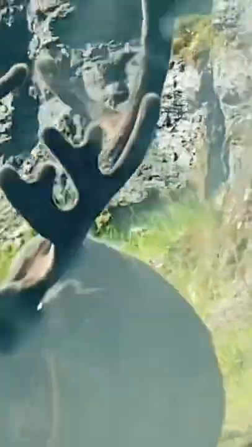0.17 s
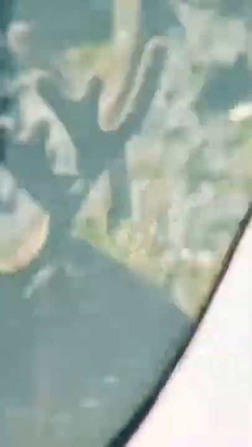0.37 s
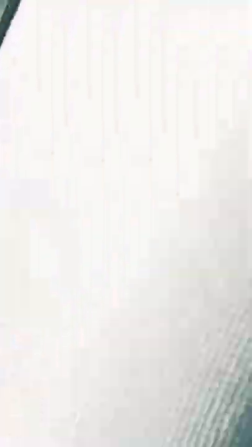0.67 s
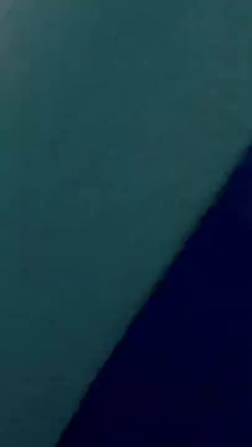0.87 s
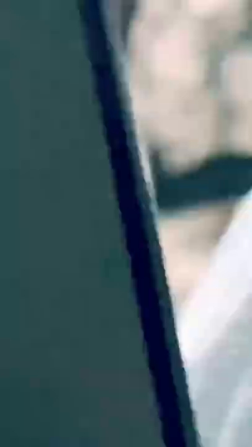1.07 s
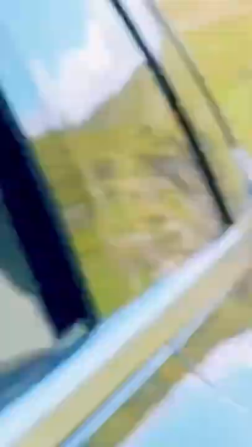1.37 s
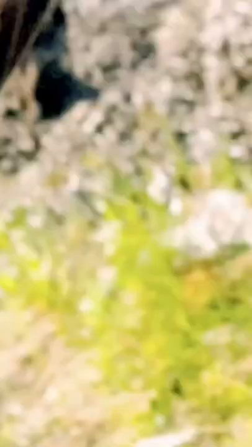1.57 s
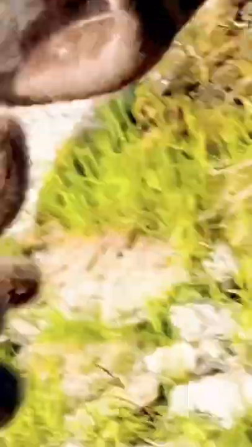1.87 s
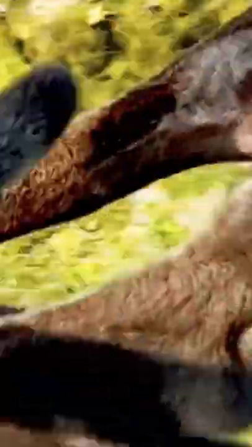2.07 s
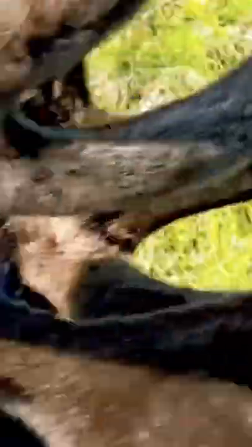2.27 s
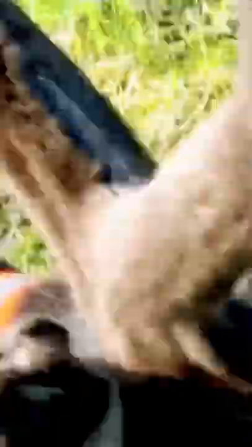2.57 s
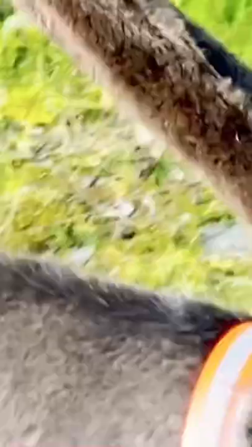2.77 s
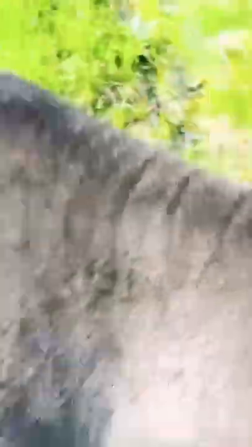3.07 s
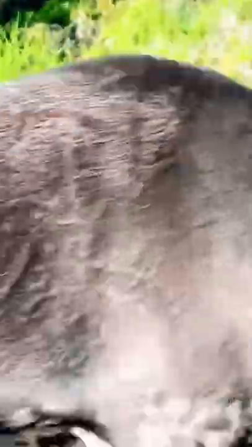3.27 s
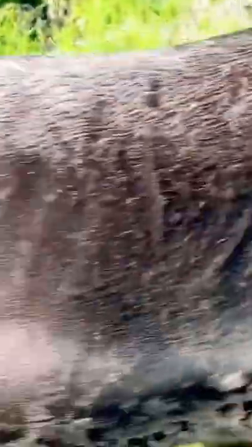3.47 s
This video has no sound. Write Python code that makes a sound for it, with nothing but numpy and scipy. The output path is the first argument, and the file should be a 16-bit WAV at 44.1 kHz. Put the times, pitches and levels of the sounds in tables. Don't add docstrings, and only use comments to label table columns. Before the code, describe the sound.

A diesel engine idles throughout, boomy and muffled inside the cabin with faint clicks; then the microphone swings to the open window, where clatter and hiss brighten and reindeer hooves snap, scuff and knock.

```python
import sys
import numpy as np
from scipy import signal
from scipy.fft import rfft, irfft, next_fast_len
from scipy.io import wavfile
from scipy.ndimage import uniform_filter1d, map_coordinates

SR = 44100
rng = np.random.default_rng(int(sys.argv[2]) if len(sys.argv) > 2 else 0)


def boost_factor(decibels):
    exponent = np.asarray(decibels, float) / 20
    return 10 ** exponent


def output_pcm(signal):
    pcm = np.clip(np.atleast_2d(signal).T, -1, 1) * 32767
    wavfile.write(sys.argv[1], SR, np.round(pcm).astype(np.int16))


N = 160083

# [t/s, clatter level/dB, road hiss level/dB]
WINDOW = [
    (0.0, -61, -72.5),
    (1.21, -60, -72),
    (1.55, -57.5, -69),
    (1.8, -56.5, -66.5),
    (2.19, -54, -62),
    (2.48, -51.5, -65),
    (2.62, -51.5, -58.5),
    (2.94, -49.5, -63),
    (3.4, -50, -60),
    (3.63, -49.5, -61),
]
# [f/Hz, level/dB]
SHEEN_TONE = [(12000, -18), (12700, 0), (13400, -12), (14100, 9), (15500, 1), (15900, -8), (16100, -40),
              (16500, -70)]


def unit(x):
    return x / np.sqrt(np.mean(x ** 2) + 1e-20)


def along(points, hz):
    f, v = np.transpose(points)
    return np.interp(np.log(hz + 1), np.log(f + 1), v)


def curves(rows):
    s, *cols = np.transpose(rows)
    return [np.interp(np.arange(N) / SR, s, c) for c in cols]


def wobble(rate):
    knots = rng.standard_normal(int(N * rate / SR) + 4)
    return map_coordinates(knots, [np.arange(N) * rate / SR])


def filtered(x, response):
    m = next_fast_len(x.shape[-1] + 8192)
    return irfft(rfft(x, m) * response(np.fft.rfftfreq(m, 1 / SR)), m)[..., :x.shape[-1]]


def resonances(rows):
    def response(f):
        total = 0
        for k, (centre, width, db) in enumerate(rows):
            ring = 1j * f * width / (centre * centre - f * f + 1j * f * width)
            total = total + (-1) ** k * boost_factor(db) * ring
        return total
    return response


def rush(spectrum, patchy_db):
    # [f/Hz, correlation]
    alike = [(60, 0.98), (130, 0.94), (290, 0.81), (640, 0.52), (1000, 0.31), (1700, 0.89), (2200, 1),
             (3000, 0.8), (4500, 0.88), (16000, 0.86)]
    z = signal.stft(rng.standard_normal((2, N)), nperseg=512)[2]
    patches = uniform_filter1d(rng.standard_normal(z.shape[1:]), 6, 0)
    patches = uniform_filter1d(patches, 10, 1)
    pair = signal.istft(z * boost_factor(patchy_db * unit(patches)), nperseg=512)[1][:, :N]

    def mid_side(hz):
        turn = np.arccos(np.clip(along(alike, hz), -1, 1)) / 2
        return boost_factor(along(spectrum, hz)) * np.array([np.cos(turn), np.sin(turn)])

    mid, side = filtered(pair, mid_side)
    return unit(np.array([mid + side, mid - side]))


def firings(sizes_db, lag_s):
    # [t/s, firings per s]
    idle = [
        (0, 30.5),
        (1.25, 30.5),
        (1.45, 31.2),
        (3.63, 31.22),
    ]
    turns = np.cumsum(curves(idle)[0]) / SR
    loudest = turns[round((3.069 + lag_s) * SR)]
    number = np.floor(turns - loudest).astype(int)
    at = np.flatnonzero(np.diff(number)) + 1
    x = np.zeros(N)
    x[at] = boost_factor(sizes_db(number[at]))
    return x


def air():
    # [f/Hz, level/dB]
    hum_tone = [(59, -67), (100, -8), (123, -12.5), (329, -20.5), (491, -23.5), (545, -20), (768, -33),
                (1930, -41), (3500, -56), (4550, -86), (7700, -120)]
    # [t/s, level/dB]
    hum_level = [
        (0.0, -52.5),
        (1.39, -52),
        (1.55, -52.5),
        (1.75, -55),
        (1.9, -53),
        (2.2, -55.5),
        (2.93, -54),
        (3.63, -55),
    ]
    # [f/Hz, level/dB]
    fan_tone = [(1500, -13), (2500, 4.5), (3020, -4), (3170, 13.5), (3330, -12), (7500, -3.5), (8300, -18),
                (11500, -75), (12500, -90)]
    # [f/Hz, level/dB]
    hiss_tone = [(1760, -5.5), (3000, -8.5), (3150, -12), (3520, -4.5), (7360, -10.5), (8420, -9.5),
                 (11300, -11.5), (12400, -16), (13000, -21), (13500, -60), (22000, -120)]
    hiss_db = curves(WINDOW)[1]
    hum = boost_factor(curves(hum_level)[0] + 5.5 + 0.7 * wobble(4.6)) * rush(hum_tone, patchy_db=1.0)
    fan = boost_factor(-75) * rush(fan_tone, patchy_db=-6.5)
    sheen_db = -73.5 + 1.9 * (hiss_db - hiss_db.max())
    sheen = boost_factor(sheen_db) * rush(SHEEN_TONE, patchy_db=0.0)
    hiss = boost_factor(hiss_db + 0.2 * wobble(9.36)) * rush(hiss_tone, patchy_db=0.5)
    return hum + fan + sheen + hiss


def scuffs():
    # [t/s, length/s, level/dB]
    drags = [(0.172, 0.034, -64), (0.255, 0.056, -66), (0.622, 0.036, -62), (1.218, 0.036, -65),
             (1.59, 0.029, -65), (1.75, 0.055, -72), (1.883, 0.036, -55.5), (2.12, 0.032, -57),
             (2.165, 0.01, -55), (2.183, 0.013, -53), (2.427, 0.053, -57.5), (2.559, 0.075, -56),
             (2.976, 0.037, -59), (3.136, 0.03, -53.5), (3.446, 0.027, -57.5)]
    # [f/Hz, level/dB]
    grit_tone = [(1500, -1), (3500, -8.5), (6000, -4), (11000, -7), (12800, -14), (13400, -40),
                 (16000, -90)]
    t, hiss_db = np.arange(N) / SR, curves(WINDOW)[1]
    swell = np.zeros(N)
    for s, length, db in drags:
        half = length / 2
        swell += boost_factor(db) * np.exp(-2 * ((t - s - half) / half) ** 2)
    grit = rng.standard_normal(N) * boost_factor(1.9 * wobble(350))
    body = unit(filtered(grit, lambda hz: boost_factor(along(grit_tone, hz))))
    airy = unit(filtered(grit, lambda hz: boost_factor(along(SHEEN_TONE, hz))))
    airy_db = -14 + 0.88 * (hiss_db - hiss_db.max())
    return swell * (body + boost_factor(airy_db) * airy)


def clicks():
    # [t/s, level over 8 ms/dB, tilt/dB per octave, hoof ring f/Hz, air above 12 kHz/dB]
    snaps = [(0.1627, -63.5, -3, 7000, -24), (0.2453, -64, 2, 3900, -25), (0.4123, -67, -6, 7450, -27),
             (0.6133, -61.5, -1, 4900, -4), (0.6374, -71, 2, 5500, -10), (0.8297, -65.5, -8, 2600, -17),
             (1.208, -54, -2, 3180, 2), (1.2336, -70, 0, 6800, -10), (1.475, -66.5, 2, 8000, -22),
             (1.725, -61.5, -2, 4900, -6), (1.872, -55, -3, 11300, 5), (2.1266, -65, 0, 7000, -2),
             (2.2162, -45, -0.5, 5300, -12), (2.461, -63, 0, 7500, -5), (2.485, -42.5, -1.5, 4500, -2),
             (2.5356, -51, -3, 4970, 2), (2.7482, -43.5, -1, 6360, -5), (2.9026, -40.5, -2, 4350, -3),
             (2.9416, -63, -4, 6000, -7), (2.9615, -55, -2, 3700, -3), (3.147, -57.5, 2, 7500, 2),
             (3.2388, -40.5, -3, 7440, -6), (3.497, -58, -9, 7460, -8), (3.555, -63, 10, 7000, -5)]
    # [f/Hz, level/dB]
    snap_tone = [(2000, -18), (3000, -8), (3900, -2), (7500, -0.5), (11000, -2), (13000, -6), (15800, -12),
                 (16800, -47)]
    x, t = np.zeros(N + SR), np.arange(4096) / SR
    lead_in = 32
    crack_fall = boost_factor(-60 * t / 0.0078)
    road_tail = boost_factor(-20 - 60 * t / 0.048)
    shape = (crack_fall + road_tail) * (1 - np.exp(-t / 0.00035))
    for s, db, tilt_db, ring_hz, air_db in snaps:
        crack = shape * rng.standard_normal(len(t))
        crack[round(0.0005 * SR)] += boost_factor(9)
        crack = np.pad(crack, (lead_in, 0))
        own = np.sqrt(uniform_filter1d(np.abs(rfft(crack, 2 * 4096)) ** 2, size=300))
        hoof = resonances([(ring_hz, 600, -0.5)])

        def tone(hz):
            tilt = tilt_db * np.clip(np.log2((hz + 1) / 6000), -1.3, 1)
            top = air_db * np.clip((hz - 11500) / 2500, 0, 1)
            even = np.interp(hz, np.linspace(0, SR / 2, len(own)), own)
            return boost_factor(along(snap_tone, hz) + tilt + top) * (1 + hoof(hz)) / even

        crack = filtered(crack, tone)
        x[round(s * SR) - lead_in:][:len(crack)] += boost_factor(db) * crack / np.std(crack[:353])
    return x[:N]


def knocks():
    fall_s = [2.5152, 3.3005, 3.4835, 2.431]
    # [level/dB, f/Hz, 60 dB decay/s, thud level/dB]
    hooves = [
        (-31, 784, .018, -1.5),
        (-35, 1170, 0.018, -7),
        (-27, 1790, 0.018, -10.5),
        (-45, 1120, 0.011, -19),
    ]
    modes = [(1.018, 3.5), (0.847, 0.0), (0.6, -13), (1.25, -28)]  # (pitch ratio, dB)
    x, t = np.zeros(N + SR), np.arange(1024) / SR
    sag = 13
    bent = (1 - np.exp(-sag * t)) / sag
    for s, (db, hz, t60, thud_db) in zip(fall_s, hooves):
        ring = sum(boost_factor(level) * np.sin(2 * np.pi * hz * ratio * bent) for ratio, level in modes)
        thud = boost_factor(thud_db + 30 * t / t60) * np.sin(2 * np.pi * 290 * t)
        decay = boost_factor(db - 60 * t / t60) * (1 - np.exp(-t / 0.001))
        x[round(s * SR):][:len(t)] += decay * (ring + thud)
    return x[:N]


def taps():
    # [t/s, level/dB, f/Hz]
    panel_taps = [
        (2.974, -46, 1050),
        (3.009, -44, 920),
        (3.0445, -40, 900),
        (3.0695, -41, 890),
        (3.105, -40, 900),
    ]
    # [t/s, level/dB, f/Hz]
    block_knocks = [(2.334, -40, 1020), (2.431, -45, 1210), (2.515, -33, 850), (2.558, -40, 907),
                    (2.587, -44, 1070), (2.625, -39, 1350), (2.658, -43, 970), (2.686, -35, 703),
                    (2.719, -42, 1040), (2.751, -41, 1160), (2.786, -49, 915), (2.813, -38.5, 1030),
                    (2.879, -38, 930), (2.91, -36.5, 880), (2.94, -38, 920), (2.973, -59, 969),
                    (3.262, -40, 960), (3.392, -40, 1310), (3.426, -42, 1600), (3.459, -40, 3030),
                   (3.52, -45, 890), (3.549, -45, 920), (3.565, -41, 1940), (3.613, -44, 1036),
                   (3.134, -38, 2490), (2.655, -41.5, 2900), (2.848, -45, 3090), (2.916, -43, 590),
                   (3.075, -39, 620)]
    x = np.zeros(N + SR)
    bursts = [(s, db, hz, 0.013) for s, db, hz in panel_taps]
    bursts += [(s, db - 7.5, hz, 0.0057) for s, db, hz in block_knocks]
    for s, db, hz, length in bursts:
        t = np.arange(round(length * SR)) / SR
        swell = np.abs(np.sin(np.pi * t / length)) ** 0.77
        ring = np.sin(2 * np.pi * hz * t) + 0.18 * np.sin(2 * np.pi * 1.4 * hz * t)
        x[round(s * SR):][:len(t)] += boost_factor(db) * swell * ring
    return x[:N]


def panel(kicks):
    # [f/Hz, width/Hz, level/dB]
    panel_modes = [(895, 24, 0), (975, 22, -7), (600, 30, -6)]
    t = np.arange(N) / SR - 3.09
    passing = np.exp(-(t / np.where(t < 0, 0.22, 0.04)) ** 2)
    near = passing + 0.23 * boost_factor(curves(WINDOW)[0] + 51.5)
    struck = kicks * (rng.random(N) < 0.85)
    strikes = signal.fftconvolve(struck, np.hanning(24))[:N]
    ring = unit(filtered(np.gradient(strikes), resonances(panel_modes)))
    return boost_factor(-55.5 - 1.5 * np.array([[1], [-1]])) * near * ring


def clatter():
    cylinder_db = [1.5, -3, 1, -1, -2.5]
    # [f/Hz, level/dB]
    clatter_tone = [(240, -7.5), (400, -9), (594, -4), (773, -12), (982, -4.5), (1790, -13), (3180, -16.5),
                    (7000, -32.5), (9100, -52), (15400, -120)]
    # [f/Hz, width/Hz, level/dB]
    block_modes = [(620, 9.2, 13.5), (876, 35, 16), (976, 10, -4.5), (1270, 160, -2.5), (1350, 32, -1),
                   (2400, 440, -51), (3100, 40, 9)]
    kicks = firings(lambda k: np.take(cylinder_db, k % 5) + 0.5 * rng.standard_normal(len(k)), 0)
    t = np.arange(4096) / SR
    burst = boost_factor(-60 * t / 0.07) * (1 - np.exp(-t / 0.0042))
    gate = signal.fftconvolve(kicks, burst)[:N]
    noise = rush(clatter_tone, patchy_db=1.8) * boost_factor(1.6 * wobble(160))
    noise = noise * (0.99 + unit(gate))
    ring = unit(filtered(noise, resonances(block_modes)))
    return panel(kicks) + boost_factor(curves(WINDOW)[0]) * unit(unit(noise) + 0.55 * ring)


def exhaust():
    # [f/Hz, width/Hz, level/dB]
    pipe_modes = [(34, 23.3, -1), (61.3, 13, 2), (89.7, 21.5, -0.5), (142, 45, -13.5)]
    # [t/s, level/dB]
    boom_level = [(0.0, -39.5), (0.15, -35.5), (0.4, -40.5), (0.55, -37), (0.7, -38), (0.95, -42.5),
                  (1.25, -43.5), (1.4, -46), (1.5, -44.5), (1.6, -34.5), (1.71, -52), (2.68, -47),
                  (2.73, -43), (2.84, -44.5), (3.34, -46), (3.63, -47)]
    # [f/Hz, level/dB]
    boom_tone = [(12, -16), (20, 1), (84, 1.5), (101, -2), (119, -5.5), (250, -34), (320, -44), (550, -120)]
    # [f/Hz, width/Hz, level/dB]
    cabin_modes = [(74.14, 7.6, -5.5), (92.19, 1.76, 5), (50.2, 1.1, -21)]
    blows = firings(lambda k: 1.5 * rng.standard_normal(len(k)), -0.009)

    def pipe(f):
        return resonances(pipe_modes)(f) / (1 + 1j * f / 161) ** 3

    thumps = boost_factor(-38 + 0.49 * wobble(2.85)) * unit(filtered(-blows, pipe))
    boom_db = curves(boom_level)[0] + 5.5
    boom = unit(boost_factor(2.5 * wobble(9.3)) * rush(boom_tone, patchy_db=0))
    boom = unit(boom + 0.72 * unit(filtered(boom, resonances(cabin_modes))))
    return thumps + boost_factor(boom_db) * boom


def scene():
    reindeer = scuffs() + clicks() + knocks()
    engine = taps() + clatter() + exhaust()
    return air() + reindeer + engine


def low_pass(x):
    return signal.sosfilt(signal.butter(12, 16970, fs=SR, output="sos"), x)


def record(dry):
    # [f/Hz, phase/rad]
    lead = [(60, 0), (150, .15), (600, 1.4), (1400, -.3), (2400, 0), (3100, .4), (5000, .3), (5500, 0),
            (7600, 0), (8100, 1.9), (9650, 1.5), (10400, 0), (11500, -.1), (12600, -3.1), (14300, -3.5),
            (15300, -6.3)]
    # [f/Hz, level/dB]
    balance = [(60, -1.8), (380, -1.1), (1400, -1), (3000, 0.5), (15000, 0.5)]

    def ports(hz):
        difference = boost_factor(along(balance, hz)) * np.exp(1j * along(lead, hz))
        halves = difference ** np.array([[.5], [-.5]])
        return halves * (hz > 22)

    return low_pass(filtered(dry, ports))


dry = scene()
out = record(dry)
output_pcm(out)
```